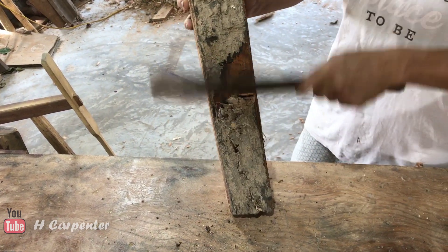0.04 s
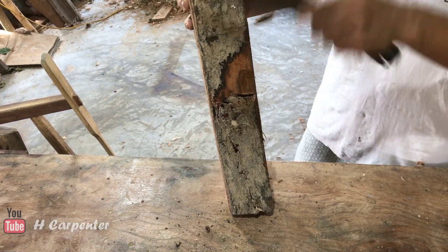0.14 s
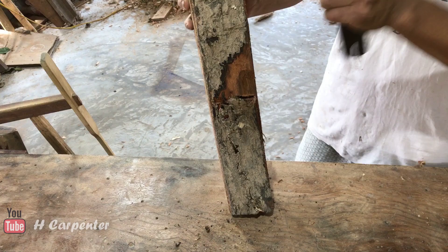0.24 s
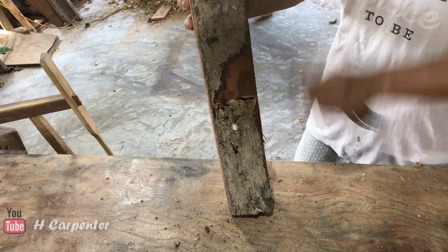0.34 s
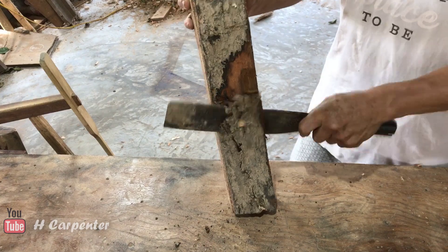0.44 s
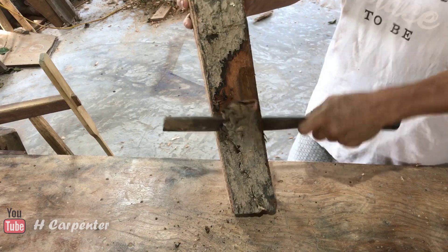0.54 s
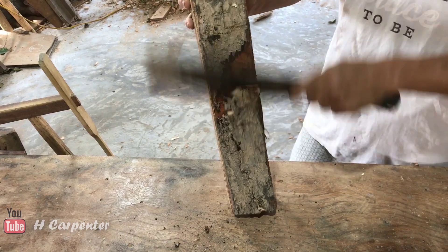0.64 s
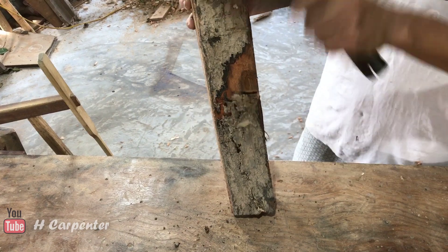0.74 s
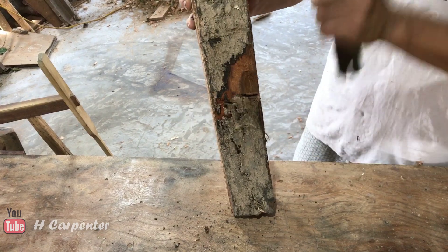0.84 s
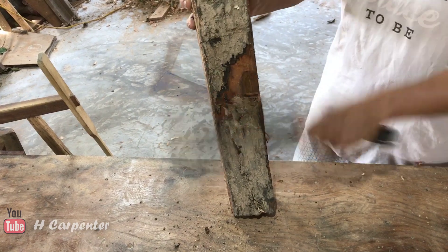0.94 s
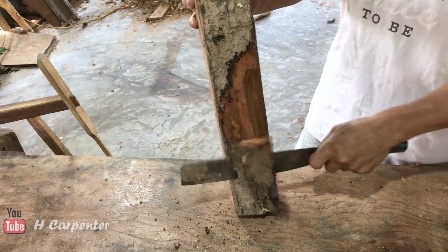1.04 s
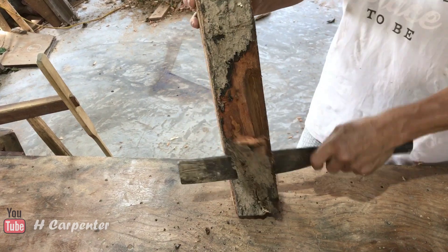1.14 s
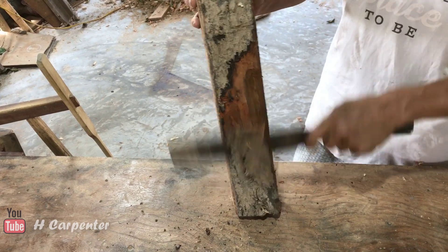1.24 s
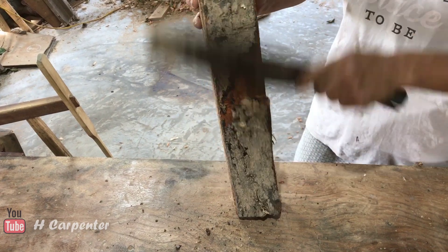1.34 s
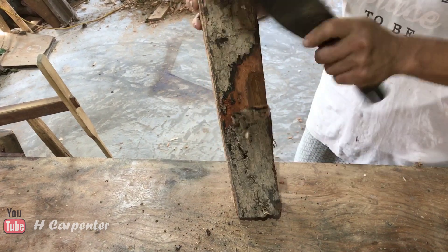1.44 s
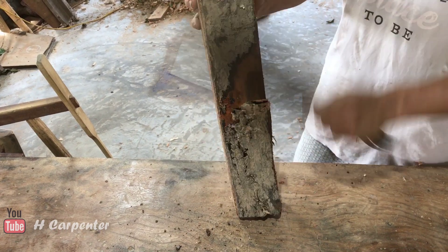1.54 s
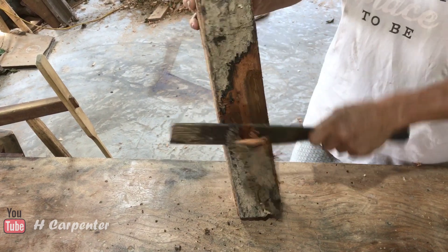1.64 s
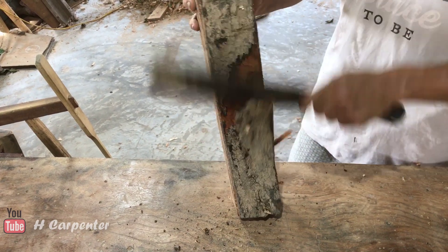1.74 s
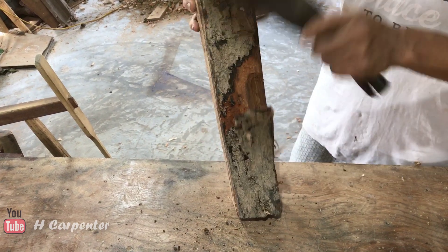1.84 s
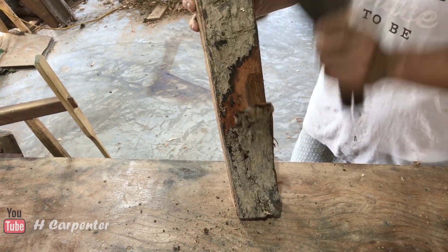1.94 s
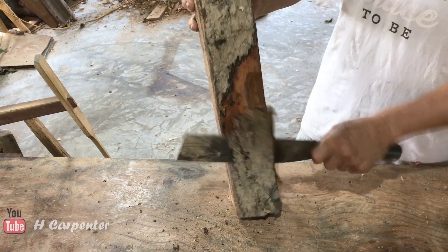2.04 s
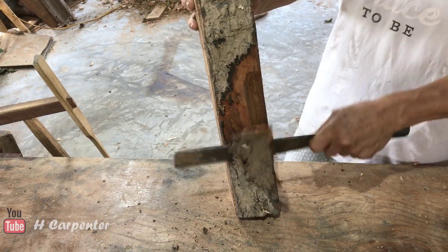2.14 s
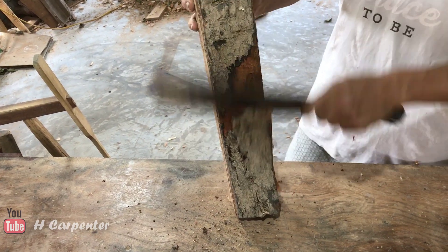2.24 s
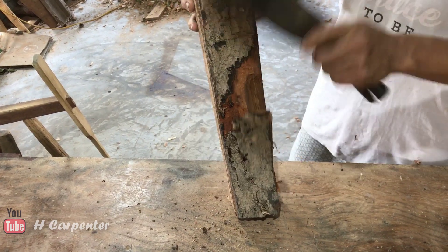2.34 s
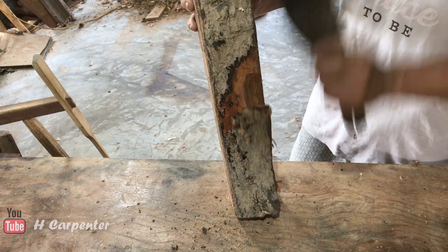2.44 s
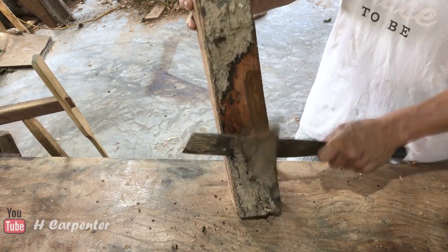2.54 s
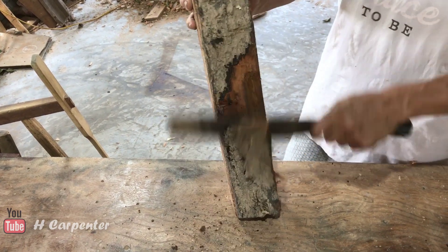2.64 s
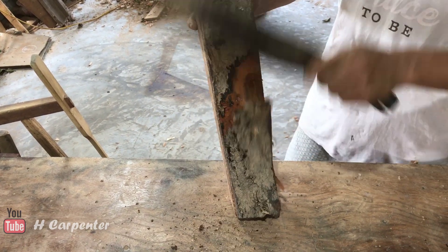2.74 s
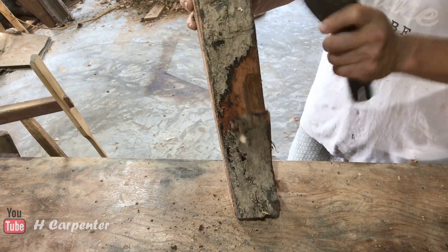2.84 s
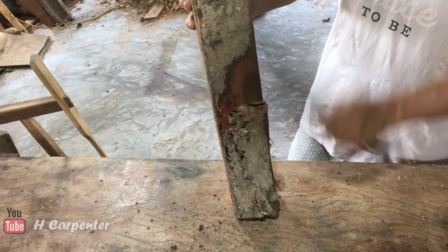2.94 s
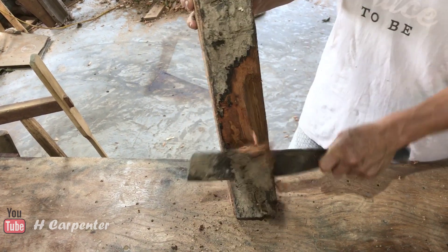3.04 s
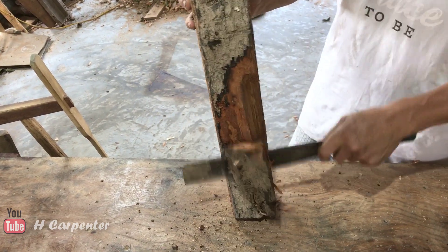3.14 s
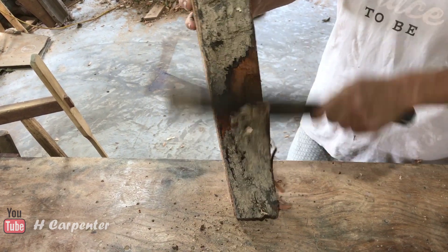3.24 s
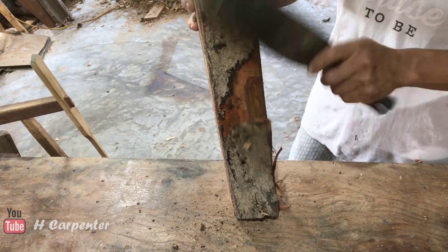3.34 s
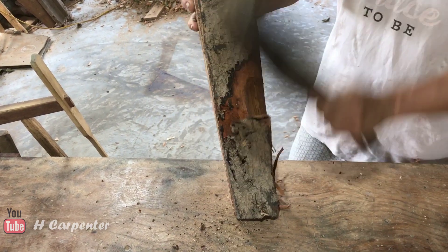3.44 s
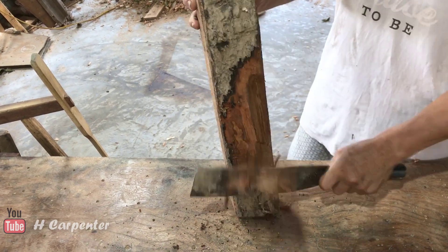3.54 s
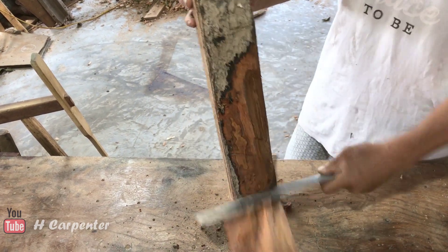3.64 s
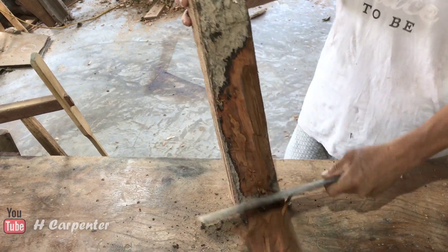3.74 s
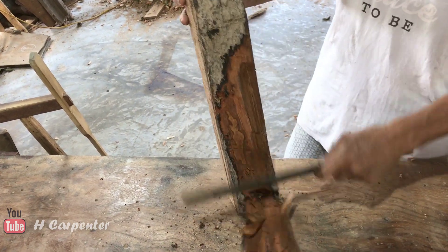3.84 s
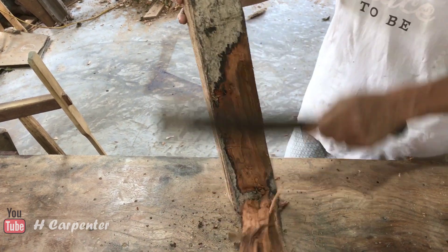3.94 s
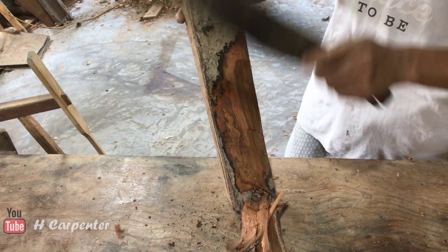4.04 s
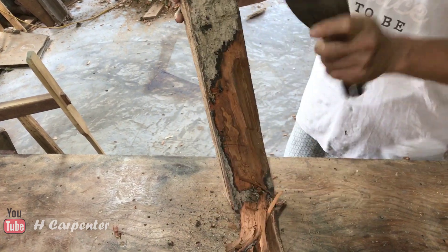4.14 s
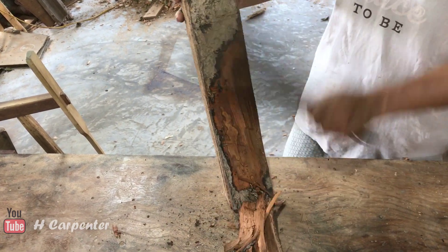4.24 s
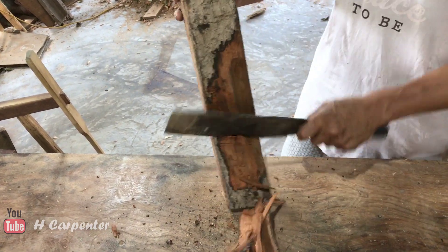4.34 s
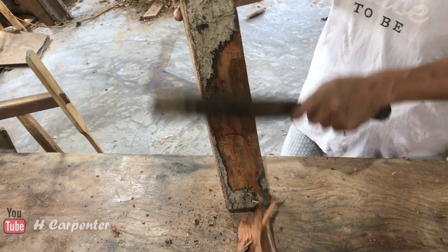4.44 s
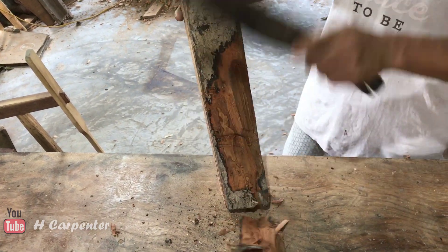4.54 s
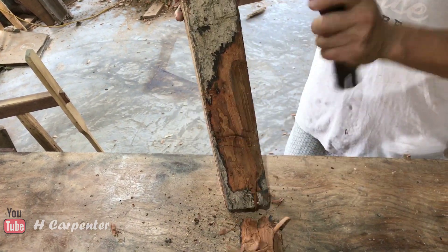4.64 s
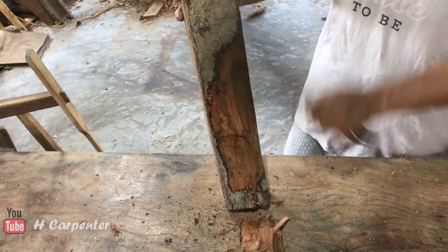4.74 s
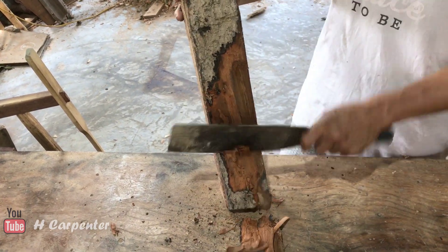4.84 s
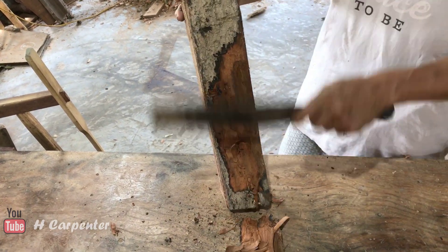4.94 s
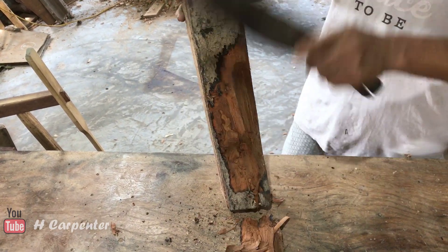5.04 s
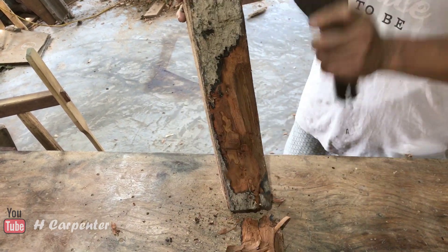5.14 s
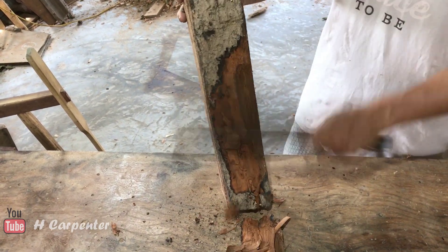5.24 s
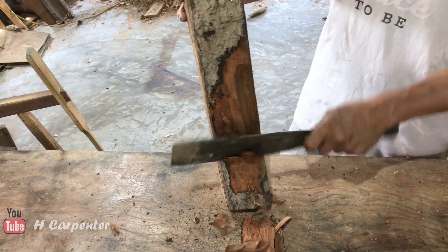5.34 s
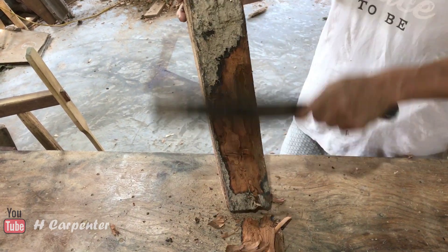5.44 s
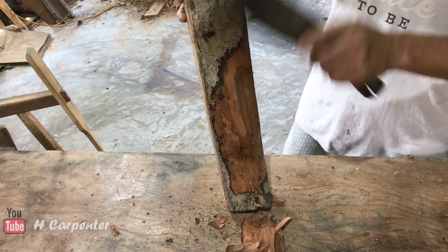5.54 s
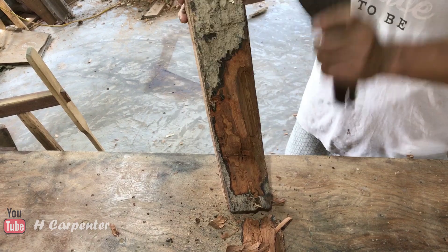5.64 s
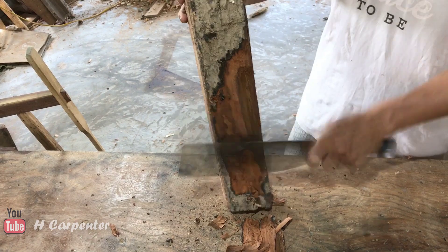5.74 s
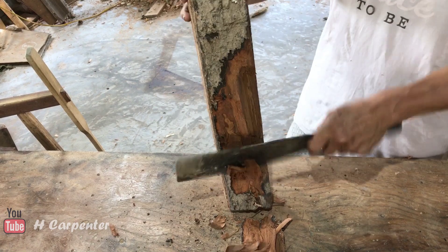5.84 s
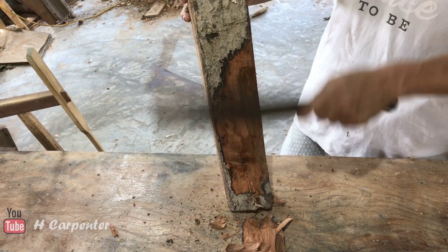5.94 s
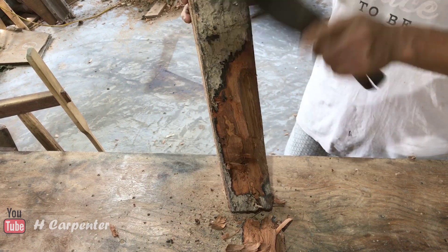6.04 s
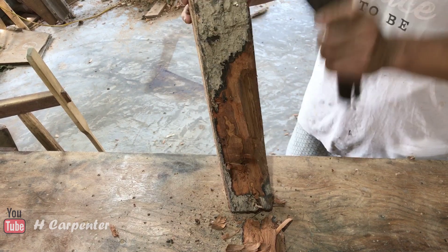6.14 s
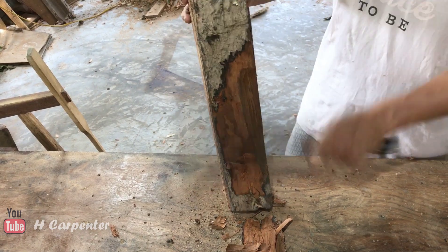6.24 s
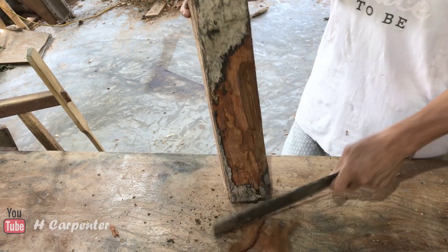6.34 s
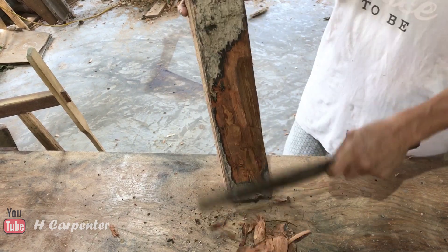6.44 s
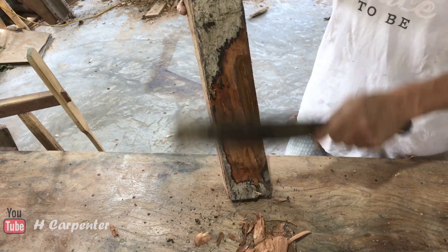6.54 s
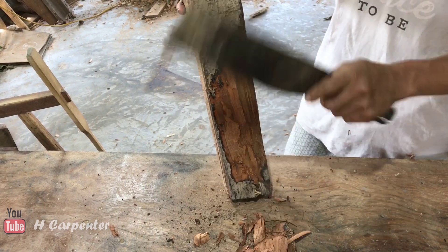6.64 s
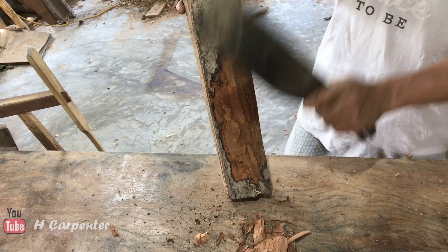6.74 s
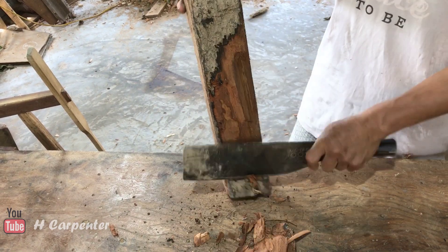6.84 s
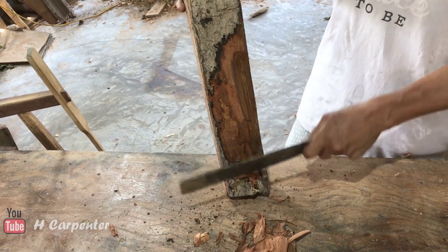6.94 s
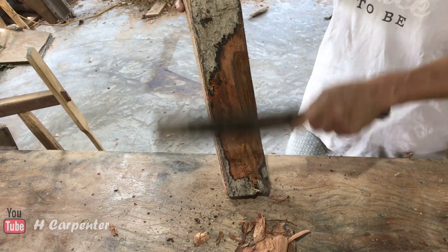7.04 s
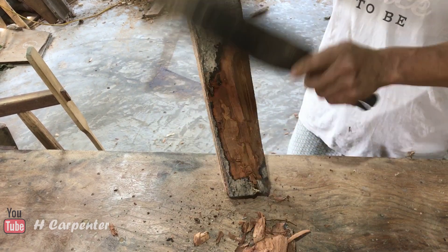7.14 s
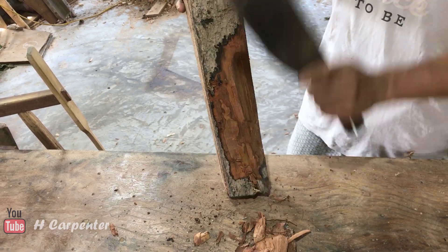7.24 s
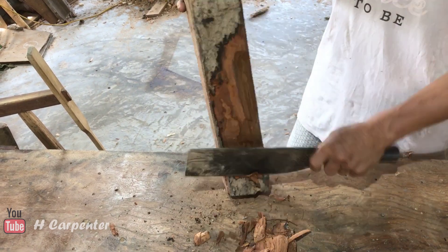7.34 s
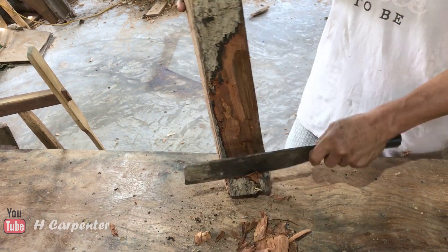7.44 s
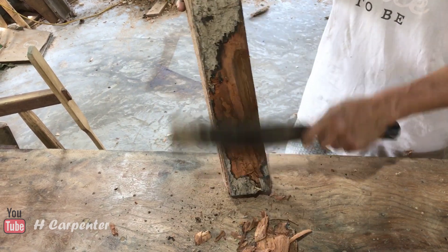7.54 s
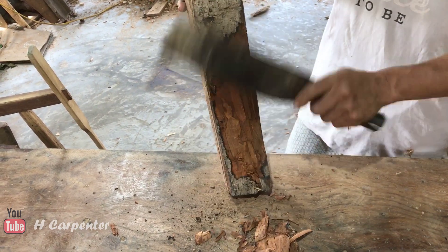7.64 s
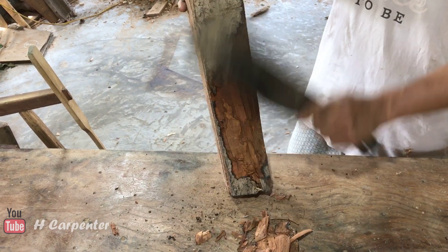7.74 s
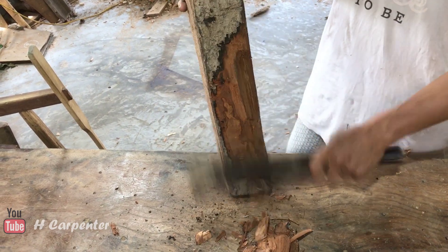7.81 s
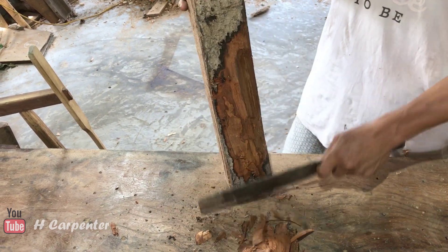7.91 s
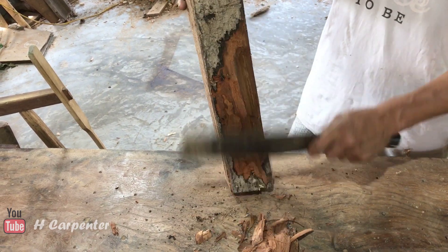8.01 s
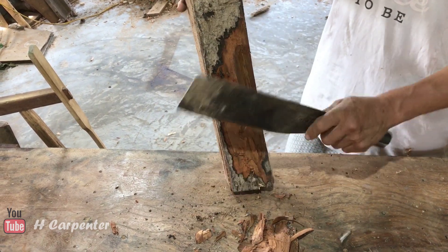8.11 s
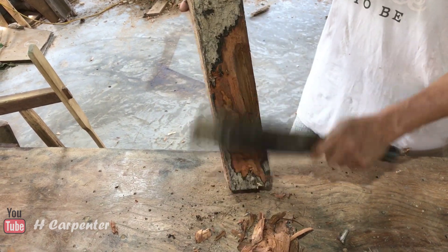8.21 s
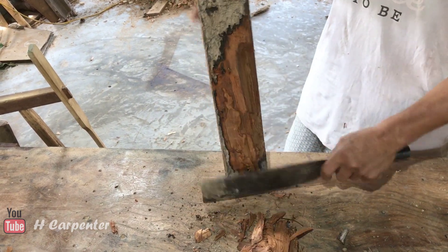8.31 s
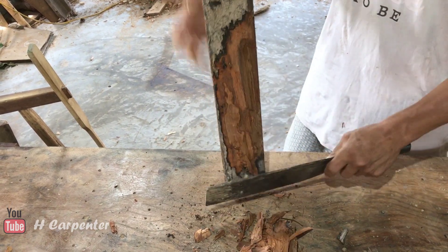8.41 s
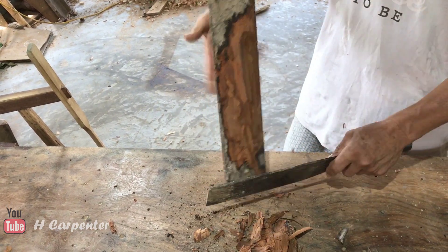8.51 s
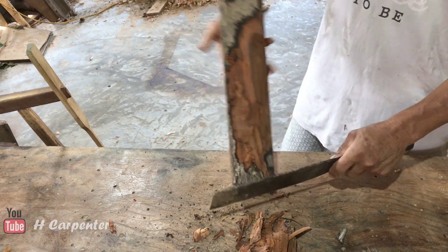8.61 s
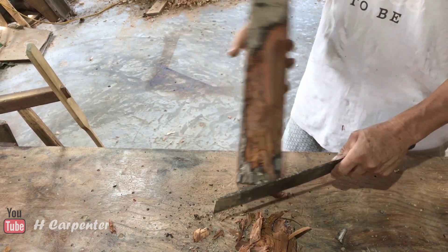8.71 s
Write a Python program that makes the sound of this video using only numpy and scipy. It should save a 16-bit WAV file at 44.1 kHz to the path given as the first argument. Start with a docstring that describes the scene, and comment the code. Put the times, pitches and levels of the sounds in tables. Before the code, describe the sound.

A broad steel blade chops bark and chips off a wooden board in steady half-second strokes, each sharp crack booming through a heavy bench.

```python
"""A workshop: a broad steel blade hews bark and chips off a board that stands on a heavy wooden workbench.
Each chop is a burst of random fibre snaps over a ringing board and blade; struck modes and noise boom below.
Three strokes run through into the bench top, as hard pulses with dying noise. Scrapes are gritty slips with
a squeak, chips and crumbs are short noise ticks, and the board's foot rubs softly near the end.
A wavering motor hum of sines lies far off in low rumble and air; decaying noise gives the reverberation."""
import sys
import numpy as np
from scipy import signal
from scipy.fft import rfft, irfft
from scipy.io import wavfile
from scipy.ndimage import uniform_filter1d

SR = 44100
rng = np.random.default_rng(int(sys.argv[2]) if len(sys.argv) > 2 else 0)


def generate_wav(signal):
    """Clip the signal to [-1, 1] and save it as 16-bit WAV at the path in sys.argv[1]."""
    frames = np.transpose(np.atleast_2d(signal))
    scaled = np.clip(frames, -1, 1) * 32767
    pcm = np.round(scaled).astype(np.int16)
    wavfile.write(sys.argv[1], SR, pcm)


N = 386757
LENGTH = int(0.7 * SR)   # samples in each single sound
AGE = np.arange(LENGTH) / SR   # seconds since the sound began

# bites of the blade into the board: start_s, crack_db, bite_s, split_over_knock_db, board_pitch_hz,
# board_ring_db (relative to the crack, before the mix)
STROKES = [(0.387, -26.5, 0.0079, 1.5, 4630, -0.5), (0.9659, -23.5, 0.021, 4, 1587, 2.5),
           (1.596, -27, 0.0034, -2.5, 1530, -5.5), (2.046, -24.5, 0.0051, 0.5, 1614, 0),
           (2.5374, -24, 0.0027, -5.5, 2553, 0), (2.989, -23.5, 0.011, 6.5, 1568, -1.5),
           (3.5102, -30.5, 0.0064, 8, 1520, 2.5), (3.516, -23.5, 0.013, 4.5, 2680, -5.5),
           (4.2919, -23, 0.013, -4, 1664, -6.5), (4.7899, -22.5, 0.014, 0.5, 1624, -3),
           (5.2735, -21, 0.0033, 2, 2470, 0.5), (5.767, -22.5, 0.0055, 1.5, 3940, -8),
           (6.2731, -17.5, 0.025, 2.5, 1486, -13), (6.8446, -24.5, 0.0054, 0, 2034, 4),
           (7.3562, -26, 0.0088, -3.5, 2047, 1.5), (7.8279, -22, 0.022, 4.5, 1460, -24),
           (8.2743, -34.5, 0.036, 12, 2150, -6), (8.2848, -34.5, 0.0018, 23, 4300, 6.5)]
# colour of the bench top under a direct blow or a rub: frequency_hz, relative_density_db (per Hz)
BENCH_TOP_COLOUR = [(120, -15), (250, -9.5), (345, 2.5), (500, -7), (620, -2.5), (900, -4), (1090, 0),
                    (1250, -6.5), (1500, -6), (1800, -14.5), (3000, -23), (8000, -45)]


def from_db(db):
    """Turns decibels into an amplitude factor."""
    return 10 ** (np.asarray(db) / 20)


def at_hz(points, hz):
    """Reads a table on a log-frequency axis."""
    table_hz, value = np.transpose(points)
    return np.interp(np.log(np.maximum(hz, 1)), np.log(table_hz), value)


def unit(x, seconds):
    """Scales the first seconds of a sound to rms 1."""
    opening = x[:max(int(seconds * SR), 1)]
    return x / np.sqrt(np.mean(opening ** 2) + 1e-20)


def band(x, hz, kind):
    """Filters with a second-order Butterworth design."""
    sections = signal.butter(2, hz, kind, fs=SR, output="sos")
    return signal.sosfilt(sections, x + 1e-18)


def convolve(x, response):
    """Passes a sound through an impulse response, keeping its length."""
    return signal.fftconvolve(x, response)[:len(x)]


def response_of(spectrum, size=8192):
    """Causal (minimum-phase) impulse response with the given spectrum."""
    hz = np.arange(size // 2 + 1) * SR / size
    cepstrum = irfft(np.log(from_db(at_hz(spectrum, hz))))
    # folding the cepstrum onto positive times makes the response causal
    cepstrum[1:size // 2] *= 2
    cepstrum[size // 2 + 1:] = 0
    return irfft(np.exp(rfft(cepstrum)))


def add(track, start_s, sound):
    """Mixes a sound into the track at its start time."""
    i = int(np.clip(start_s * SR, 0, N))
    track[i:i + len(sound)] += sound[:N - i]


def dying(t60_s):
    """Exponential decay that falls by 60 dB in t60_s."""
    return from_db(-60 * AGE / max(t60_s, 1e-3))


def ring(modes, scatter_db):
    """Struck modes; every blow meets each of them with a strength and sign of its own."""
    total = 0
    for hz, db, t60_s in modes:
        strength = from_db(db + scatter_db * rng.normal()) * rng.choice([-1, 1])
        total = total + strength * np.sin(2 * np.pi * hz * AGE) * dying(t60_s)
    return total


def snaps(per_s, spread_db):
    """Random tiny fractures of uneven size and either sign."""
    sizes = from_db(spread_db * np.minimum(rng.exponential(1, LENGTH), 3))
    signs = rng.choice([-1, 1], LENGTH)
    return sizes * signs * (rng.random(LENGTH) < per_s / SR)


def splinter(force, colour, split_db, treble_db, seconds, knock_hz=2150, treble_hz=5800):
    """Fractures radiated by the wood: a woody knock, the splitting relative to it, and bright treble."""
    sound = convolve(force, colour)
    # each crossover is filtered twice for steeper slopes
    mids = band(band(sound, treble_hz, "low"), treble_hz, "low")
    treble = band(band(sound, treble_hz, "high"), treble_hz, "high")
    knock = band(band(mids, knock_hz, "low"), knock_hz, "low")
    split = band(band(mids, knock_hz, "high"), knock_hz, "high")
    wood = unit(knock, seconds) + from_db(split_db) * unit(split, seconds)
    return unit(wood, seconds) + from_db(treble_db) * unit(treble, seconds)


def air_noise():
    """Low rumble and thin air: steady noise shaped in the spectrum."""
    # background colour: frequency_hz, relative_density_db (per Hz)
    air_colour = [(20, -2.5), (35, -1.5), (60, 0), (130, -4.5), (200, -12), (300, -15.5), (420, -27.5),
                  (700, -29), (1050, -25), (2200, -32.5), (3300, -31.5), (5000, -38.5), (8000, -49),
                  (16000, -53.5)]
    level_db = -43.5   # rms
    hz = np.arange(N // 2 + 1) * SR / N
    air = irfft(rfft(rng.standard_normal(N)) * from_db(at_hz(air_colour, hz)), N)
    return from_db(level_db) * air / np.std(air)


def motor_hum():
    """Distant motor: steady sines whose phases wander slowly."""
    # hum partials: pitch_hz, level_db (rms)
    partials = [(86, -55), (124, -51.5), (168, -58.5), (269, -67)]
    t = np.arange(N) / SR
    hum = 0
    for hz, db in partials:
        waver = np.interp(t, np.linspace(0, t[-1], 60), rng.standard_normal(60))
        hum = hum + from_db(db) * np.sqrt(2) * np.sin(2 * np.pi * hz * t + 0.89 * waver)
    return hum


def workshop(x):
    """Room reverberation: diffuse reflections build up over a few ms and die band by band."""
    # reverberation time: frequency_hz, t60_s
    room_decay = [(200, 0.35), (600, 0.46), (1500, 0.43), (3000, 0.31), (6000, 0.44), (12000, 0.37),
                  (16000, 0.18)]
    edges_hz = np.geomspace(150, 19200, 8)
    tail = 0
    for low, high in zip(edges_hz, edges_hz[1:]):
        reflections = band(rng.standard_normal(LENGTH), [low, high], "band")
        tail = tail + reflections * dying(at_hz(room_decay, np.sqrt(low * high)))
    tail = tail * (1 - np.exp(-(AGE / 0.0033) ** 2))
    return convolve(x, tail / np.sqrt(np.sum(tail ** 2)))


def shuffle():
    """The board's foot rubs on the bench top: a dull, soft rumble that swells and fades."""
    start_s, length_s, level_db = 8.56, 0.19, -38
    progress = np.clip((np.arange(N) / SR - start_s) / length_s, 0, 1)
    swell = np.sin(np.pi * progress)
    rub = band(convolve(rng.standard_normal(N), response_of(BENCH_TOP_COLOUR)), 690, "low")
    frame = band(rng.standard_normal(N), [70, 260], "band")
    return from_db(level_db) * swell * (unit(frame, 0.89) + from_db(-12.5) * unit(rub, 1))


def scrapes(colour):
    """The blade is dragged out of the cut or along the bark: gritty slips and a singing edge."""
    # drags of the blade: start_s, level_db (of the grit's mids)
    drags = [(0.0, -54.5), (0.592, -58.5), (1.226, -54.5), (3.166, -54), (3.933, -62.5)]
    time_scale_s, treble_db = 0.072, 1.5
    squeak_hz = 11100   # the edge sings as it slides along the grain
    swell = np.sin(np.pi * np.minimum(AGE / time_scale_s, 1)) ** 2
    drag = swell + 0.67 * np.exp(-AGE / time_scale_s * 2)
    edge = np.sin(2 * np.pi * squeak_hz * AGE) * dying(0.06)
    out = np.zeros(N)
    for start_s, db in drags:
        slips = snaps(per_s=1800, spread_db=1.5) * drag
        squeak = unit(convolve(slips, edge), time_scale_s)
        grit = splinter(slips, colour, 4, treble_db, time_scale_s)
        add(out, start_s, from_db(db) * (grit + from_db(-9.5) * squeak))
    return out


def crumbs():
    """Every stroke throws a crumb that lands a moment later; rows are like those of the large chips."""
    fall_s, spread_s = 0.19, 0.2
    level_db, scatter_db, treble_db = -63.5, 5.5, 1
    rows = []
    for start_s, *_ in STROKES:
        landing_s = start_s + fall_s + spread_s * rng.random()
        rows.append((landing_s, level_db + scatter_db * rng.normal(), treble_db))
    return rows


def chips(colour):
    """Large chips snap off or drop, and crumbs land: short dying ticks of noise."""
    # large chips: start_s, level_db (of the mids), treble_over_mids_db
    large_chips = [(0.634, -63, 14), (3.7364, -32.5, -4.5), (3.7474, -41.5, 5), (4.447, -43.5, -7),
                   (5.4657, -58.5, 12), (5.485, -51, 3), (8.456, -48, -11), (8.535, -55.5, 7.5)]
    out = np.zeros(N)
    for start_s, db, treble_db in large_chips + crumbs():
        impact = rng.standard_normal(LENGTH) * dying(0.02)
        add(out, start_s, from_db(db) * splinter(impact, colour, 3, treble_db, 0.0041))
    return out


def knocks():
    """Steel meets the bench top: a hard pulse, then the plank's many close modes die away."""
    # landings on the bench top: start_s, level_db, pulse_over_plank_db, t60_s
    landings = [(6.2994, -17, 26, 0.091), (6.3110, -17.5, 14, 0.15), (7.8591, -16, 16.5, 0.2),
                (8.32, -20.5, 27, 0.14)]
    colour = response_of(BENCH_TOP_COLOUR)
    out = np.zeros(N)
    for start_s, db, pulse_db, t60_s in landings:
        plank = rng.standard_normal(LENGTH) * dying(t60_s)
        plank[0] = from_db(pulse_db)
        add(out, start_s, from_db(db) * unit(convolve(plank, colour), 0.024))
    return out


def bench(boom_db, body_db):
    """The board drives the bench: clear modes over an irregular rumble. Returns direct and thrown sound."""
    # low modes of the bench frame: pitch_hz, relative_level_db, t60_s
    frame_table = [(42, -1, 0.4), (85, -7.5, 0.11), (124.13, 2.5, 0.45), (179.3, -0.5, 0.49),
                   (209, -4.5, 0.35)]
    # higher modes of the bench plank: pitch_hz, relative_level_db, t60_s
    plank_table = [(275, -6, .25), (302, -3, .14), (330, 1, .35), (388, -1, .3), (423, -6, .28),
                   (461, -11, .3), (497, -12, .25), (592, -16, .3), (651, -18, .3), (712, -17, .25),
                   (866, -17, .2), (1050, -13, .2)]
    # dull thud of the plank, too many modes to tell apart: frequency_hz, relative_density_db (per Hz)
    thud_colour = [(120, -14.5), (220, -4.5), (330, 2), (400, -3), (480, -10), (620, -13), (820, -16.5),
                   (1080, -12.5), (1500, -34.5), (3000, -42.5)]
    push = 1 - np.exp(-AGE / 0.0034)   # the heavy bench takes a few ms to get moving
    clatter_force = rng.standard_normal(LENGTH) * dying(0.3) * push
    clatter = unit(convolve(clatter_force, response_of(thud_colour)), 0.084)
    plank_modes = unit(push * ring(plank_table, scatter_db=2.5), 0.057)
    rumble_noise = band(rng.standard_normal(LENGTH), [55, 240], "band")
    rumble = unit(rumble_noise * dying(0.35) * push, 0.13)
    frame_modes = unit(push * ring(frame_table, scatter_db=2.0), 0.11)
    body = from_db(body_db) * (from_db(-2.0) * plank_modes + from_db(-7) * clatter)
    boom = from_db(boom_db) * (from_db(0.5) * frame_modes + from_db(-5) * rumble)
    return body + boom, from_db(body_db - 7.5) * clatter


def blade_ring():
    """The steel blade rings briefly, damped by the grip and the cut."""
    # blade modes: pitch_hz, relative_level_db, t60_s
    blade_modes = [(1586, -2, .32), (2030, -6, .16), (2309, -8, .2), (2480, -5, .24), (3408, -9, .18),
                   (3688, -8, .2), (4414, -14, .2), (4690, -11, .28), (6050, -13, .2), (6250, -11, .26),
                   (6400, -14, .2)]
    return from_db(-16) * unit(ring(blade_modes, scatter_db=2), 0.03)


def board_ring(pitch_hz, ring_db, entering, pressing):
    """The board rings at a pitch set by where it is hit, blurred by the shifting contact."""
    blur = 0.04 * np.sqrt(pitch_hz / 1600)   # random phase step, radians per sample
    phase = 2 * np.pi * pitch_hz * AGE + np.cumsum(rng.normal(0, blur, LENGTH))
    decay = pressing + 0.5 * dying(80 / pitch_hz)   # high pitches die sooner
    return from_db(ring_db - 4.5) * unit(np.sin(phase) * entering * decay, 0.061)


def cut(colour, bite_s, split_db, treble_db, pitch_hz, ring_db):
    """Fibres snap while the edge sinks in; returns the direct sound and the sound thrown into the room."""
    release = np.exp(-np.maximum(AGE - bite_s, 0) / 0.013)
    pressing = release * np.exp(-0.55 * AGE / max(bite_s, 1e-3))
    entering = 1 - np.exp(-AGE / 0.00023)
    # each side of the board radiates its own fractures
    fibres = snaps(per_s=15000, spread_db=2.0) * pressing * entering
    front = splinter(fibres, colour, split_db, treble_db, 0.027)
    scattered = pressing + 0.12 * dying(0.11)   # drawn out by the clutter around the bench
    around = splinter(rng.standard_normal(LENGTH) * scattered, colour, split_db, treble_db, 0.025)
    board = board_ring(pitch_hz, ring_db, entering, pressing)
    return front + board + blade_ring(), from_db(-6.5) * around + from_db(-11.5) * board


def stroke_balance(start_s, db, bite_s, split_db):
    """How a stroke shares out its force: levels of the treble, the bench's boom and its body, in dB."""
    # effort and bite are counted from an ordinary stroke of -25 dB and 0.01 s
    effort_db = db + 25
    doublings = np.log2(max(bite_s, 1e-3) / 0.01)
    # dry bark adds treble until it is hewn away
    bare_wood_db, fresh_bark_db, bark_lasts_s = -4, 9, 1.45
    bark_db = bare_wood_db + fresh_bark_db * np.exp(-start_s / bark_lasts_s)
    # harder strokes reach duller wood; strokes that split well tear more bark
    treble_db = bark_db - 0.3 * effort_db + 0.1054 * split_db
    # the bench takes the force that splitting leaves; the sooner the blade stops, the more it booms
    boom_db = -27 - 0.5 * split_db - 1.5 * doublings
    # splitting spares the plank too; a longer bite makes it slightly quieter
    body_db = -30 - 1.12 * split_db - 0.1 * doublings
    return treble_db, boom_db, body_db


def chops(colour):
    """Every stroke cuts the board and shakes the bench; returns direct and thrown sound."""
    direct, thrown = np.zeros((2, N))
    for start_s, db, bite_s, split_db, pitch_hz, ring_db in STROKES:
        treble_db, boom_db, body_db = stroke_balance(start_s, db, bite_s, split_db)
        cut_direct, cut_thrown = cut(colour, bite_s, split_db, treble_db, pitch_hz, ring_db)
        bench_direct, bench_thrown = bench(boom_db, body_db)
        add(direct, start_s, from_db(db) * cut_direct + bench_direct)
        add(thrown, start_s, from_db(db) * cut_thrown + bench_thrown)
    return direct, thrown


def scene():
    """Mixes the background, the bench sounds, the chops and their reverberation."""
    # colour of snapping fibres: frequency_hz, relative_density_db (per Hz)
    crack_colour = [(300, -23), (700, -12), (1150, -11), (1500, -4), (1850, -5.5), (2300, -4.5), (3700, -3),
                    (5000, -11), (6100, -14), (7500, -20.5), (10200, -20), (11400, -16), (16000, -21.5)]
    colour = response_of(crack_colour)
    background = air_noise() + motor_hum()
    bench_sounds = shuffle() + scrapes(colour) + chips(colour) + knocks()
    direct, thrown = chops(colour)
    room = workshop(thrown + from_db(-6.0) * bench_sounds)
    return (background + bench_sounds + direct + room)[None]


def record(dry):
    """A fast limiter holds the cracks down, the last peaks are rounded and the top is cut."""
    top_cut = signal.ellip(10, 0.3, 80, 15900, fs=SR, output="sos")   # low-pass at 15900 Hz
    sound = signal.sosfilt(top_cut, dry)
    level_db = 20 * np.log10(np.abs(sound[0]) + 1e-9)
    over_db = np.maximum(level_db + 5.9, 0)   # excess over the -5.9 dB threshold
    release_db = 900 * np.arange(N) / SR   # 900 dB per second
    held_db = np.maximum.accumulate(over_db + release_db) - release_db
    held_db = uniform_filter1d(held_db, size=32)
    limited = sound * from_db(-held_db)
    rounded = limited / (1 + (limited / 0.43) ** 6) ** (1 / 6)
    return signal.sosfilt(top_cut, rounded)


dry = scene()
out = record(dry)
generate_wav(out)
```